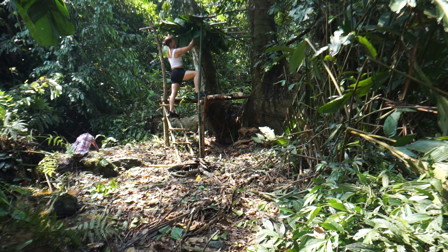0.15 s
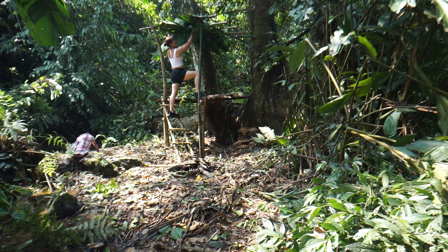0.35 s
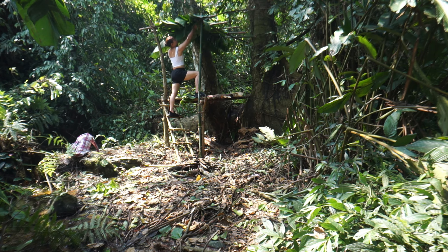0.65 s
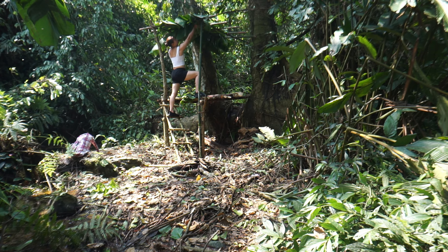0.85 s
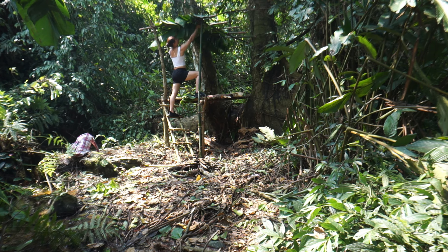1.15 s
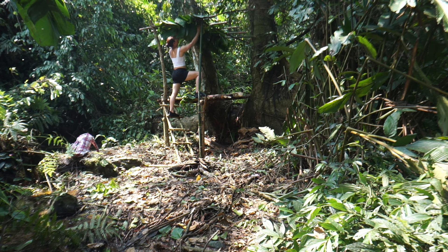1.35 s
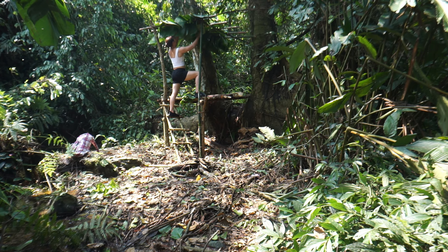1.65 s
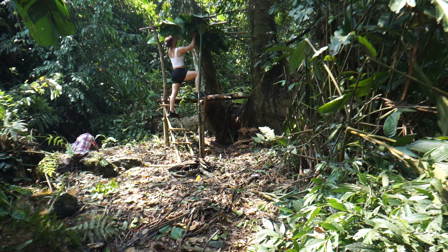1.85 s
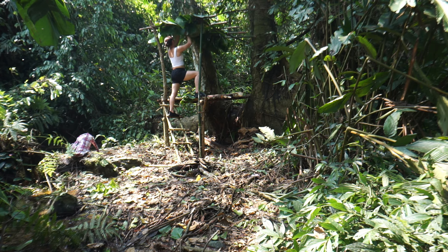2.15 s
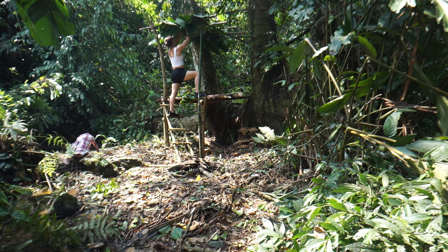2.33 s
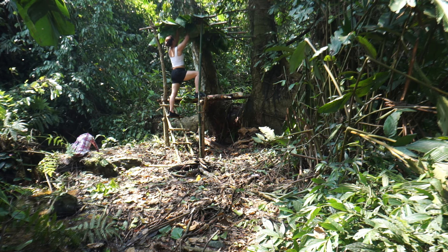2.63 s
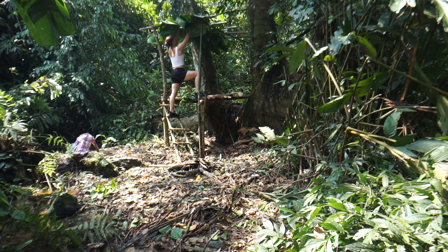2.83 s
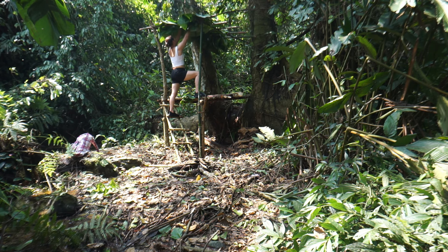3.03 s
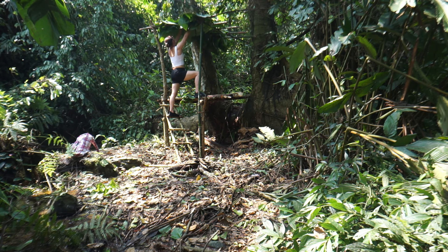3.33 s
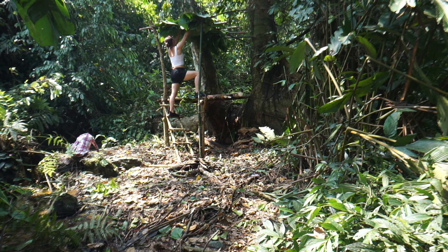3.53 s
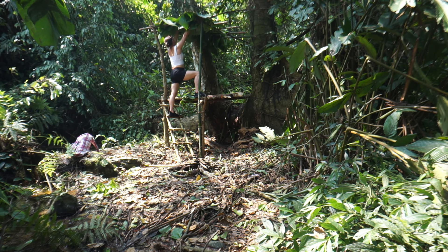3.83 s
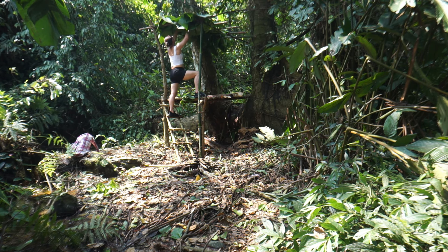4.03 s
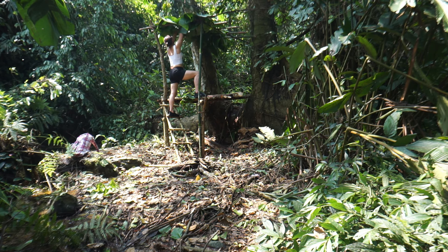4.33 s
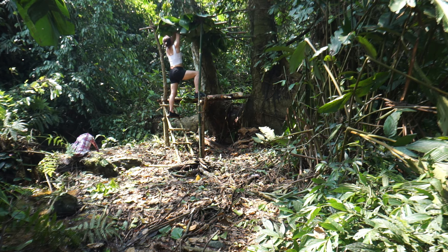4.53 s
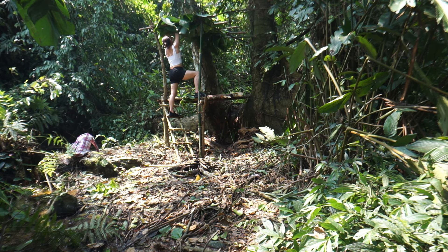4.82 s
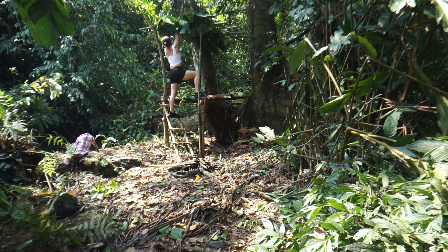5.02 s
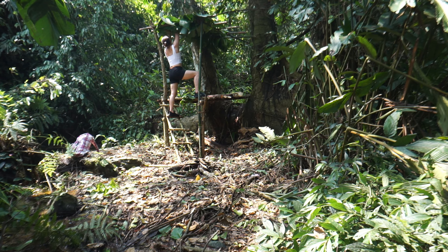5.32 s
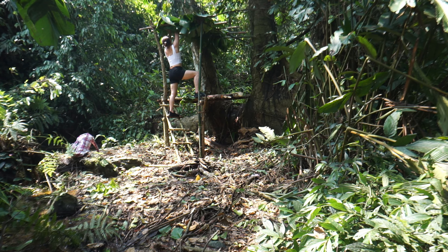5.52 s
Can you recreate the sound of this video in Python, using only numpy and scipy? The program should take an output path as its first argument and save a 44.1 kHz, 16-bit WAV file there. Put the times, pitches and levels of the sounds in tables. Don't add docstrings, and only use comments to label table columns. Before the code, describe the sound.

Short rising bird whistles pulse in quick runs, answered by a softer second bird, over a hissing, gurgling stream and crackling dry leaves in woodland.

```python
import sys
import numpy as np
from scipy import signal
from scipy.fft import rfft, irfft, next_fast_len
from scipy.io import wavfile
from scipy.ndimage import uniform_filter1d, map_coordinates

SR = 44100
rng = np.random.default_rng(int(sys.argv[2]) if len(sys.argv) > 2 else 0)


def attenuation_scalar(level_db):
    decades = np.asarray(level_db, float) / 20
    return 10 ** decades


def transcribe(u):
    v = np.clip(np.atleast_2d(u).T, -1, 1)
    q = np.round(v * 32767).astype(np.int16)
    wavfile.write(sys.argv[1], SR, q)


N = 250047
LEAD = SR // 10


def unit(x):
    return x / np.sqrt(np.mean(x ** 2) + 1e-20)


def along(points, hz):
    f, value = np.transpose(points)
    return np.interp(np.log(hz + 1), np.log(f + 1), value)


def wobble(rate):
    knots = rng.standard_normal(int(N * rate / SR) + 4)
    return map_coordinates(knots, [np.arange(N) * rate / SR])


def filtered(x, response):
    m = next_fast_len(N + SR // 2)
    return irfft(rfft(x, m) * response(np.fft.rfftfreq(m, 1 / SR)), m)[..., :N]


# f/Hz, likeness (0-1)
PORT_LIKENESS = [(60, 0), (170, 1), (520, 0.51), (900, 1), (1400, 0.85), (2700, 0.82), (4300, 0.98),
                 (6500, 0), (15000, 0.1)]


def ports(pair):
    def like(hz):
        return np.clip(along(PORT_LIKENESS, hz), 0, 1)

    own = filtered(pair[1], lambda hz: np.sqrt(1 - like(hz) ** 2))
    return np.array([pair[0], filtered(pair[0], like) + own])


def rush(spectrum, patchy_db):
    z = signal.stft(rng.standard_normal((2, N)), nperseg=512)[2]
    patches = rng.standard_normal(z.shape[1:])
    patches = uniform_filter1d(patches, size=6, axis=0)
    patches = uniform_filter1d(patches, size=8, axis=1)
    pair = signal.istft(z * attenuation_scalar(patchy_db * unit(patches)), nperseg=512)[1][:, :N]
    return unit(ports(filtered(pair, lambda hz: attenuation_scalar(along(spectrum, hz)))))


# f/Hz, width/Hz, rms level/dB
INSECT_BANDS = [
    (9400, 590, -57),
    (10800, 330, -60.5),
]


def insects():
    chorus = np.zeros((2, N))
    for hz, width, db in INSECT_BANDS:
        noise = rng.standard_normal((2, N))
        band = unit(filtered(noise, lambda f: np.exp(-((f - hz) / width) ** 2)))
        chorus += attenuation_scalar(db + 0.77 * wobble(8.1)) * band
    return chorus


# f/Hz, level/dB
CANOPY_SPECTRUM = [(1500, -29), (3000, -4.5), (5000, -3.5), (8000, -3), (11000, -4), (12000, -7.5),
                   (15800, -10.5)]


def canopy():
    return attenuation_scalar(-43 + 0.41 * wobble(6.0)) * rush(CANOPY_SPECTRUM, patchy_db=0.77)


def grains(s, hz, t60, peak):
    step = np.arange(SR // 25)
    t = step / SR
    phase = 2 * np.pi * hz[:, None] * t * (1 + 0.04 * t / t60[:, None])
    decay = attenuation_scalar(-60 * t / t60[:, None])
    onset = 1 - np.exp(-t / 0.0009)
    wave = peak[:, None] * np.sin(phase) * decay * onset
    at = np.round(s * SR).astype(int)[:, None] + step
    return np.bincount(at.ravel(), wave.ravel(), N + SR)[:N]


# f/Hz, level/dB
WATER_SPECTRUM = [(25, -42), (90, -38), (150, -26.5), (250, -15), (400, -9), (630, -6), (1250, -3),
                  (2000, -2), (3200, -5.5), (6000, -12), (12000, -35)]
# t/s, peak level/dB, f/Hz
LOUD_BUBBLES = [(0.049, -37, 1510), (0.279, -38.5, 1380), (0.298, -38.5, 982), (0.434, -36, 975),
                (0.607, -44, 914), (1.1, -35.5, 1690), (1.147, -35, 1274), (1.429, -34, 965),
                (1.476, -35, 1270), (1.675, -37, 1600), (1.722, -35.5, 1550), (2.117, -34, 1200),
                (2.23, -37, 900), (2.655, -40, 830), (2.749, -37, 1420), (2.883, -35.5, 1070),
                (2.884, -42.5, 621), (2.967, -35.5, 1450), (3.165, -30.5, 1410), (3.243, -42, 830),
                (3.332, -39, 1176), (3.525, -38, 1500), (3.593, -39.5, 1055), (3.819, -31.5, 1490),
                (4.051, -35, 1690), (4.264, -27.5, 1230), (4.843, -39, 1210), (4.891, -35, 702),
                (5.037, -37, 1260), (5.178, -35, 1450),
                (0.1885, -39, 2100), (0.3112, -37, 2480), (0.6454, -39, 2330), (0.9842, -33, 2420),
                 (1.0849, -34, 1890), (1.3404, -37, 1810), (1.4222, -31.5, 2180), (1.8372, -36, 2260),
                 (2.9367, -29, 1880), (2.9682, -29, 2850), (3.022, -38, 3060), (3.1208, -39, 2150),
                 (3.1642, -36, 1880), (3.8666, -36, 1870), (4.0083, -37, 2000), (4.2602, -39, 1800),
                 (4.8414, -38, 1860), (4.9427, -37, 2090), (5.3213, -38, 2410), (5.3981, -37, 2380),
                 (5.5079, -33.5, 2210)]


def stream():
    when, size, force = rng.random(size=(1200, 3)).T
    hz = 1400 * np.exp(0.808 * (2 * size - 1))
    bed = grains(when * N / SR, hz, 25 / hz, attenuation_scalar(-46.5 + 8.8 * force ** 3))
    s, db, pitch = np.transpose(LOUD_BUBBLES)
    bubbles = bed + grains(s, pitch, 40 / pitch, attenuation_scalar(db + 8.0))
    water = attenuation_scalar(-40 + 0.5 * wobble(5.5)) * rush(WATER_SPECTRUM, patchy_db=0.82)
    return water + ports([bubbles, np.roll(bubbles, SR // 100)])


# f/Hz, level/dB
LEAF_SPECTRUM = [(300, -42), (800, -23), (2000, -2.5), (3000, -0.5), (6500, -3), (11000, -2), (15800, -5.5)]
# peak t/s, peak level/dB, swell over 20 dB t/s, settle over 20 dB t/s
LEAF_STROKES = [(1.112, -56, .1, .15), (1.19, -55, .01, 0.22), (1.25, -48, .012, .13),
                (1.422, -55, .01, .04), (1.575, -50, .14, .1), (1.77, -52.5, .12, 0.12),
                (2.095, -51, .05, 0.14), (2.172, -45.5, 0.027, 0.15), (2.76, -52, .1, .1),
                (2.862, -44.5, .015, .3), (2.908, -41.5, .1, .12), (2.975, -39.5, 0.22, 0.12),
                (3.022, -43, 0.0072, 0.1), (3.05, -45.5, .05, 0.09), (3.121, -43, .004, .02),
                (3.255, -54, .1, .1), (3.45, -55, .3, 0.33), (4.05, -56.5, .3, .3),
                (5.0385, -41.5, .003, 0.073)]
# t/s, peak level/dB, centre f/Hz
LEAF_SNAPS = [(1.1902, -36, 8570), (1.2491, -36, 9520), (1.4227, -26.5, 9700), (1.5725, -29, 9050),
              (2.0316, -31, 7970), (2.0931, -35, 10200), (2.1704, -33, 10100), (2.1886, -27, 10100),
              (2.6269, -35, 10200), (2.8586, -30, 6950), (2.8818, -32, 8090), (2.9028, -42, 10600),
              (3.023, -30, 5820), (3.1203, -33, 6800), (3.7379, -42.5, 7700), (3.7933, -38, 10800),
              (5.019, -32, 8510), (5.037, -27, 8500)]


def leaves():
    now = np.arange(N) / SR
    stroke = np.zeros(N)
    for s, db, swell, settle in LEAF_STROKES:
        below_peak = np.maximum(20 * (s - now) / swell, 20 * (now - s) / settle)
        stroke = np.maximum(stroke, attenuation_scalar(db - below_peak))
    spikes = attenuation_scalar(3.5 * wobble(2500) + 1.5 * wobble(150))
    crackle = unit(spikes * rush(LEAF_SPECTRUM, patchy_db=1.2))
    out = attenuation_scalar(10) * stroke * crackle
    t = np.arange(SR // 20) / SR
    for s, db, hz in LEAF_SNAPS:
        crack = rng.standard_normal((2, len(t))) * attenuation_scalar(db - 3 - 60 * t / 0.012)
        ping = attenuation_scalar(db + 1.5 - 60 * t / 0.0062) * np.sin(2 * np.pi * hz * t)
        out[:, round(s * SR):][:, :len(t)] += crack + ping
    return filtered(out, lambda f: f ** 2 / (f ** 2 + 400 ** 2))


def whistles(calls, voice):
    start_hz, length, bend, rise, fall, early = voice
    ahead = SR // 100
    song = np.zeros(N + SR)
    u = np.arange(-int(early * length * SR), int(length * SR)) / (length * SR)
    swell = ((u + early) / (1 + early)) ** rise * (1 - u) ** fall
    for s, db, top_hz in calls:
        pitch = top_hz - (top_hz - start_hz) * (1 - u) ** bend
        whistle = swell * np.sin(2 * np.pi * np.cumsum(pitch) / SR)
        start = LEAD - ahead + round((s - early * length) * SR)
        song[start:][:len(u)] += attenuation_scalar(db) * whistle
    return song


# delay t/s, level/dB
WOOD_SCATTER = [(0, -30), (.035, -12), (.05, -6), (.08, -5), (.115, -5), (.135, -7), (.17, -13), (.25, -23),
                (.5, -40)]


def among_trunks(song, trunks, wet_db, warm_hz, left_db):
    delay, echo_db = np.transpose(WOOD_SCATTER)
    decay = attenuation_scalar(wet_db + np.interp(np.arange(SR // 2) / SR, delay, echo_db))
    path = rng.standard_normal((2, SR // 2)) * decay
    resonance = [1, -1.9 * np.cos(2 * np.pi * warm_hz / SR), .91]
    path = signal.lfilter([1, -1], resonance, path) * .1
    for s, db in trunks:
        path[0, round(s * SR)] += attenuation_scalar(db)
        path[1, round((s + .002 * rng.random()) * SR)] += attenuation_scalar(db)
    path[1] = attenuation_scalar(-left_db) * (.7 * path[0] + .7 * path[1])
    return signal.fftconvolve(song[None], path, axes=1)[:, LEAD:LEAD + N]


# t/s, level/dB, top f/Hz
LOW_CALLS = [(-.04, -19, 4610), (.140, -20.5, 4500), (.325, -20, 4510), (.507, -20.5, 4485),
             (.692, -20.5, 4500), (.878, -21.5, 4490), (1.063, -22, 4510), (1.267, -23, 4505),
             (1.462, -23, 4470), (2.980, -23.5, 4500), (3.190, -24, 4510), (3.397, -23, 4500),
             (3.585, -25.5, 4530), (3.774, -23, 4495), (3.963, -26.5, 4385), (4.137, -20, 4520),
             (4.321, -20.5, 4500), (4.501, -20.5, 4535), (4.688, -22, 4500), (4.868, -22, 4590),
             (5.062, -23.5, 4480)]
# start f/Hz, length t/s, bend, rise, fall (exponents), soft lead-in share
LOW_WHISTLE = (3940, .055, 2.2, 1.15, 1, .13)
# delay t/s, level/dB
LOW_ECHOES = [(0.0044, -14.0), (0.01141, -11.0), (0.01238, -6.0), (0.01512, -9.0), (0.01789, -7.0),
              (0.02143, -7.0), (0.02526, -8.0), (0.02782, 0.0), (0.02914, -12.0), (0.03036, -4.0),
              (0.03615, -10.0), (0.03898, -2.0), (0.05918, -13.0), (0.07036, -14.0)]


def low_bird():
    song = whistles(LOW_CALLS, LOW_WHISTLE)
    return among_trunks(song, LOW_ECHOES, wet_db=-30, warm_hz=3970, left_db=1.5)


# t/s, level/dB, top f/Hz
HIGH_CALLS = [(2.331, -30, 4810), (2.565, -29.5, 4740), (2.765, -28, 4680), (2.969, -29, 4710),
              (3.167, -28, 4700), (3.372, -30, 4710), (3.561, -26.5, 4633), (3.759, -29, 4700),
              (3.955, -28, 4664), (4.621, -31, 4810), (4.823, -29.5, 4640), (5.025, -30, 4700)]
# start f/Hz, length t/s, bend, rise, fall (exponents), soft lead-in share
HIGH_WHISTLE = (3970, .07, 2.2, .55, 1, .03)
# delay t/s, level/dB
HIGH_ECHOES = [(0.01283, -4.0), (0.01454, 0.0), (0.01796, -4.0), (0.0195, -3.0), (0.02138, -4.0),
               (0.02458, -0.0), (0.02925, -8.0), (0.03435, -2.0), (0.03644, -8.0), (0.04127, -7.0),
               (0.0442, -13.0), (0.04592, -10.0), (0.05084, -11.0), (0.05385, -13.0)]


def high_bird():
    song = whistles(HIGH_CALLS, HIGH_WHISTLE)
    return among_trunks(song, HIGH_ECHOES, wet_db=-24.5, warm_hz=4030, left_db=2.5)


def scene():
    return insects() + canopy() + stream() + leaves() + high_bird() + low_bird()


def roll_off(x):
    return signal.sosfilt(signal.butter(12, 15840, fs=SR, output="sos"), x)


# f/Hz, left over right level/dB
RIGHT_LOSS = [(60, -1.0), (110, 2.5), (200, 1), (380, 1.5), (700, 2), (1290, 4.0), (2380, 6), (4400, 8.5),
              (8120, 11), (15000, 10)]
# f/Hz, phase/rad
RIGHT_PHASE = [(90, 0.54), (260, 1.13), (690, 1.72), (1400, 1.7), (2500, 1.435), (9500, 1.64), (14000, .2)]


def record(dry):
    def right_port(hz):
        return attenuation_scalar(-along(RIGHT_LOSS, hz)) * np.exp(1j * along(RIGHT_PHASE, hz))

    right = filtered(dry[1], right_port)
    both = filtered(np.array([dry[0], right]), lambda hz: hz < 15840)
    return roll_off(both)


dry = scene()
out = record(dry)
transcribe(out)
```